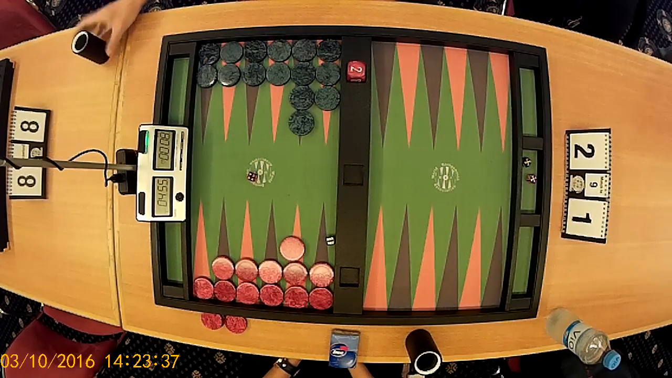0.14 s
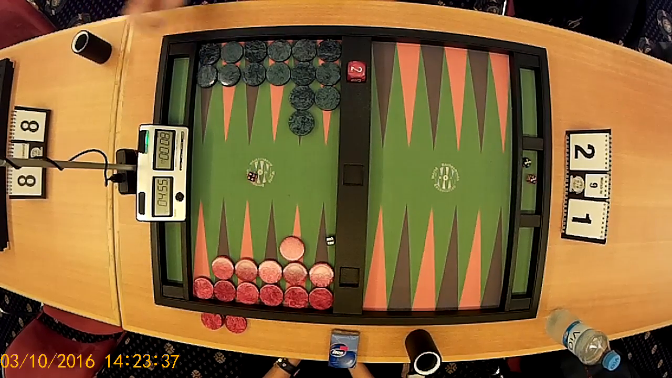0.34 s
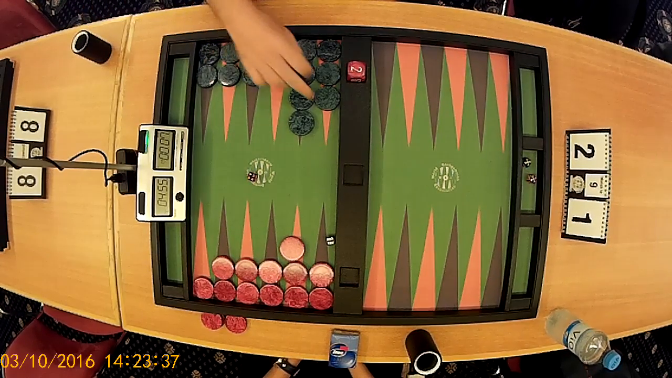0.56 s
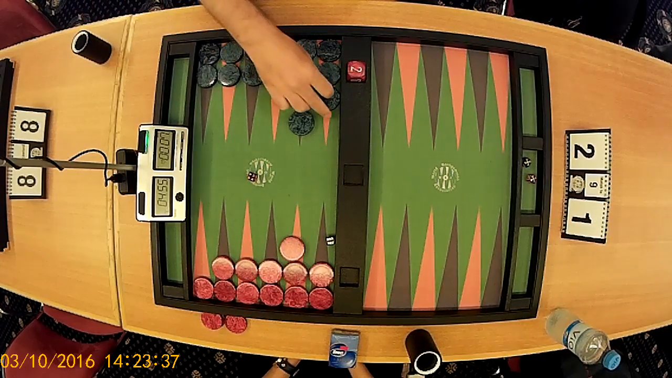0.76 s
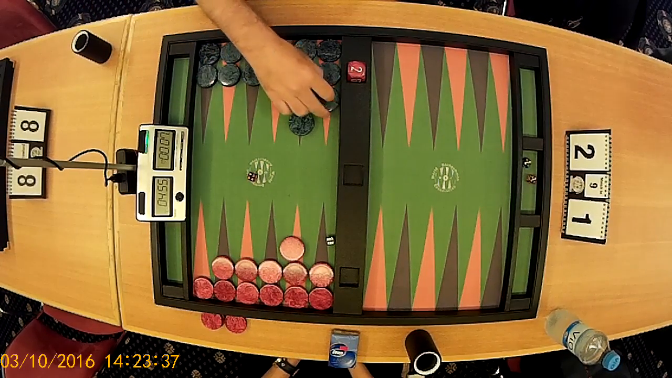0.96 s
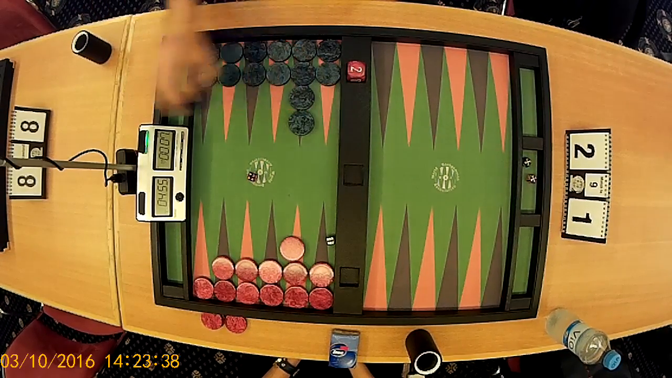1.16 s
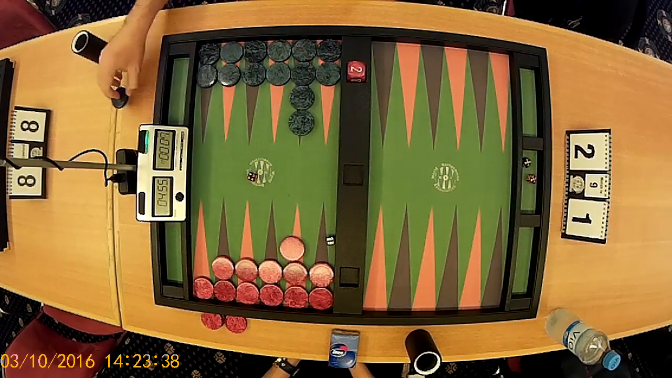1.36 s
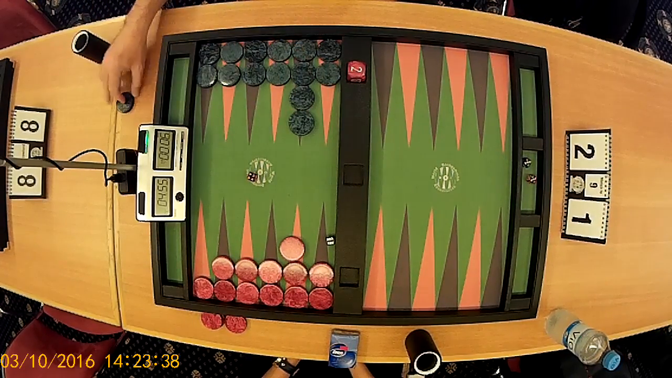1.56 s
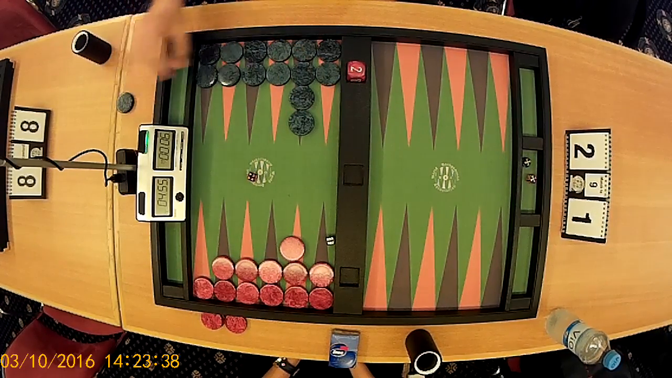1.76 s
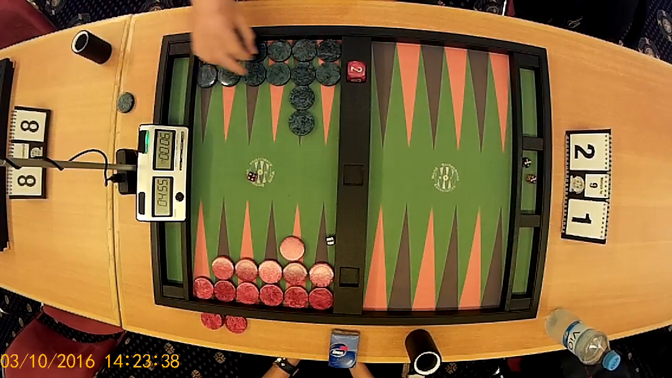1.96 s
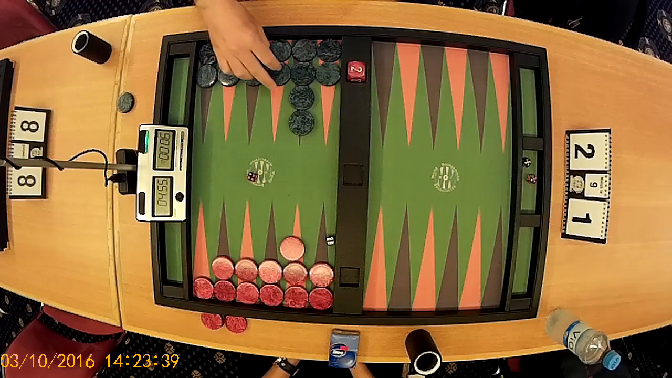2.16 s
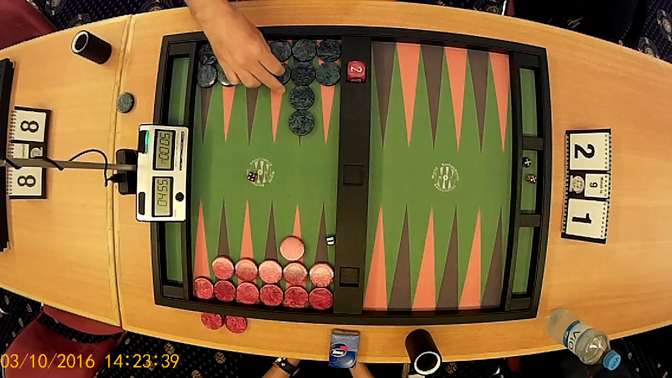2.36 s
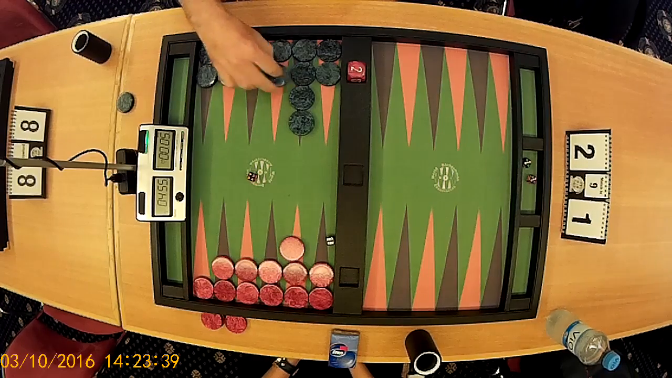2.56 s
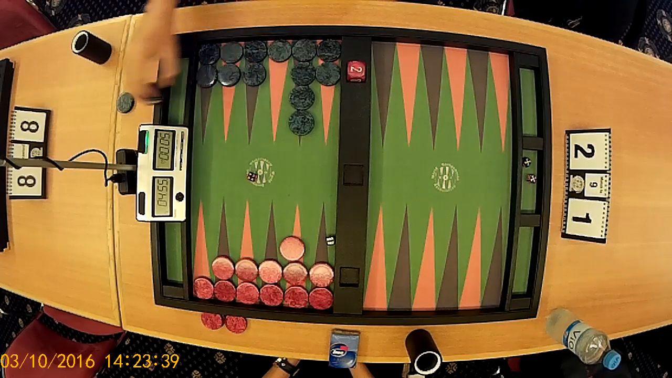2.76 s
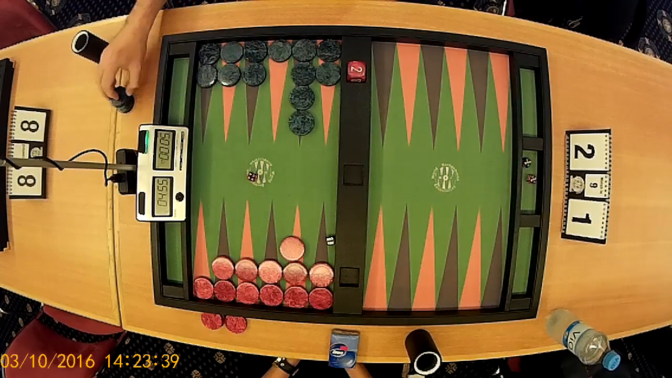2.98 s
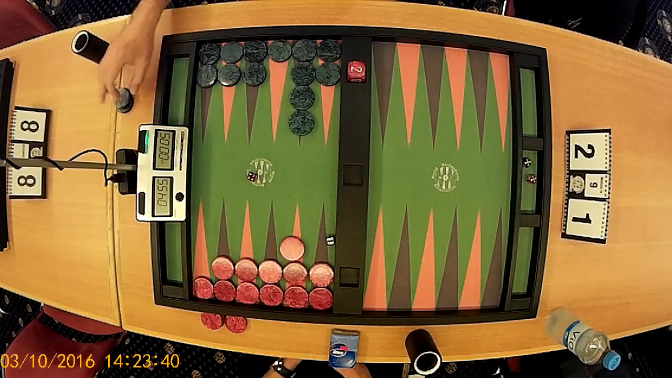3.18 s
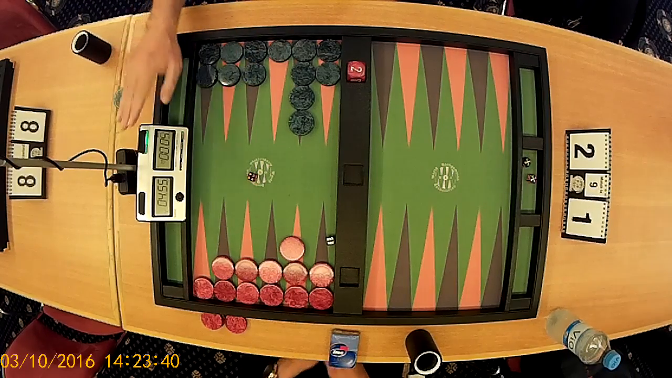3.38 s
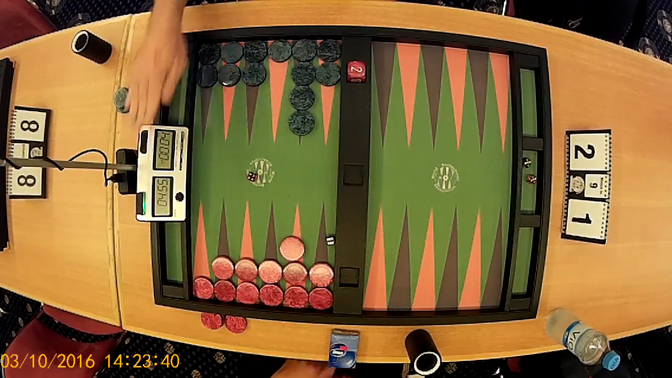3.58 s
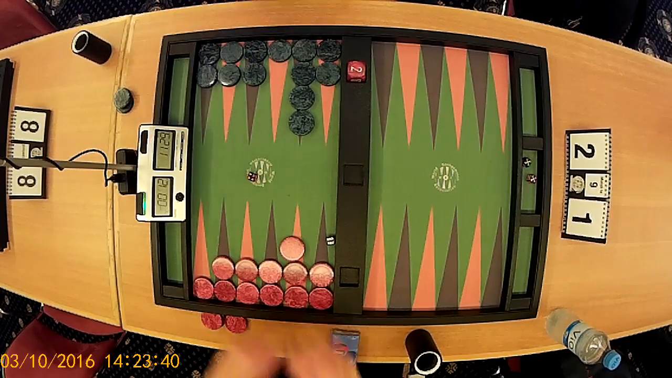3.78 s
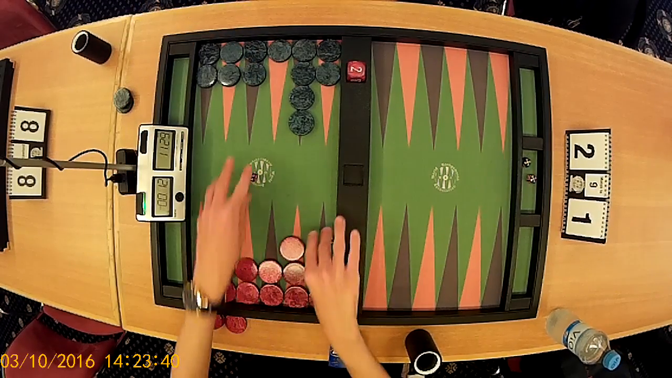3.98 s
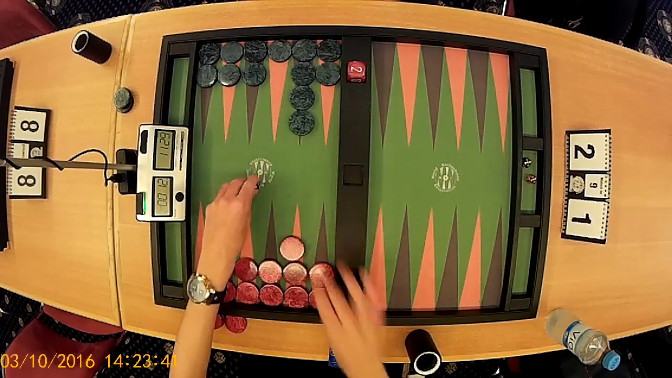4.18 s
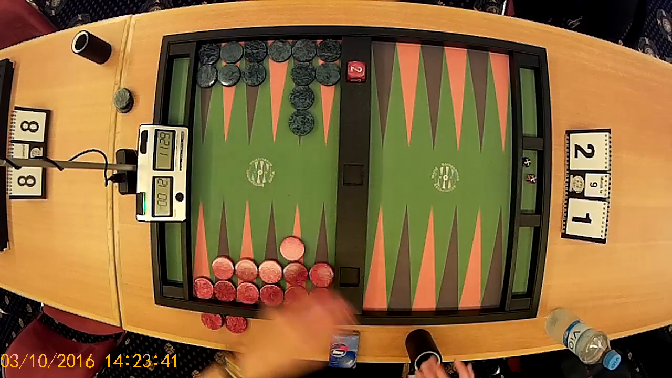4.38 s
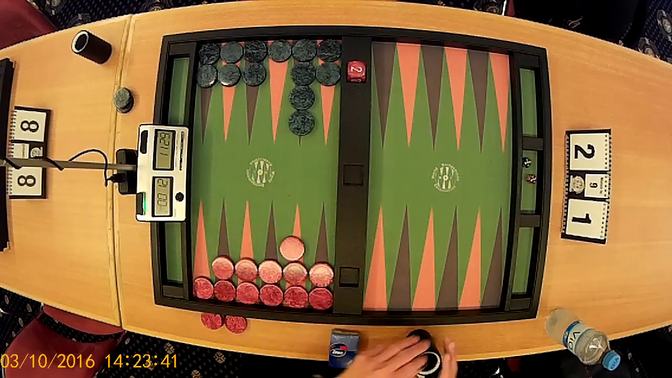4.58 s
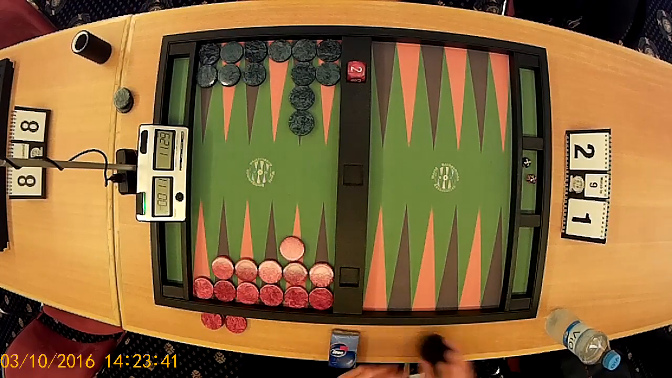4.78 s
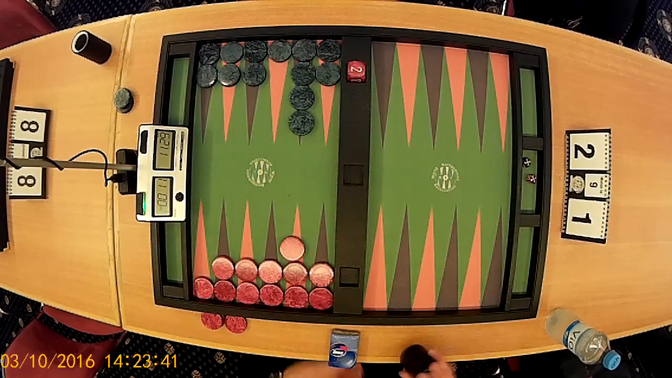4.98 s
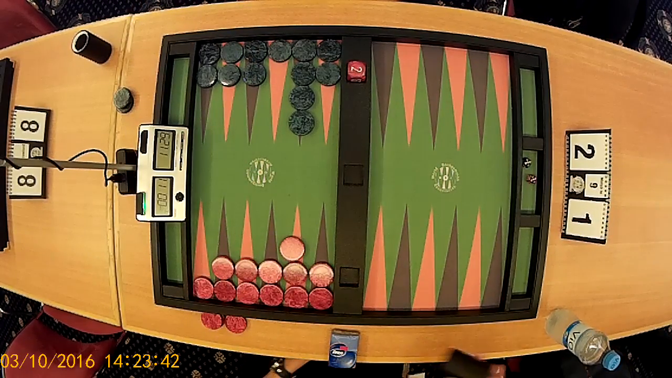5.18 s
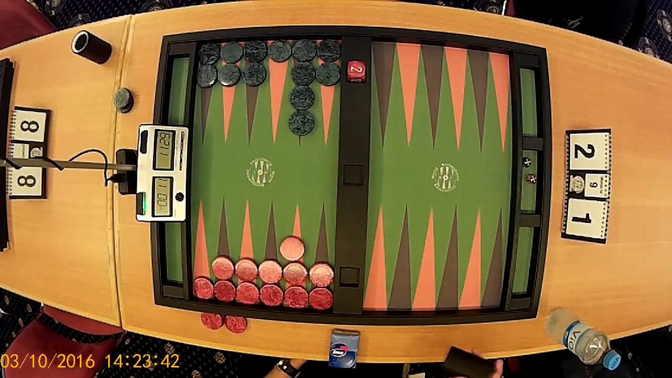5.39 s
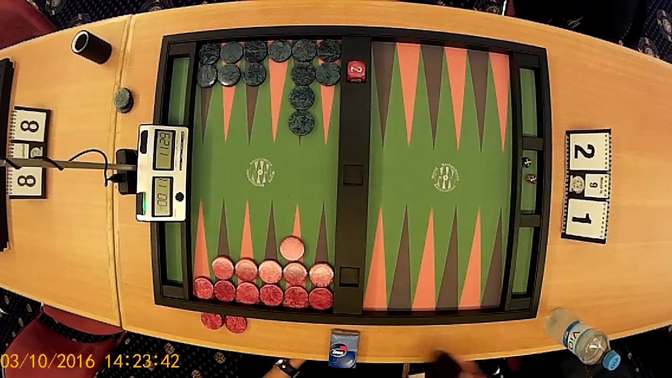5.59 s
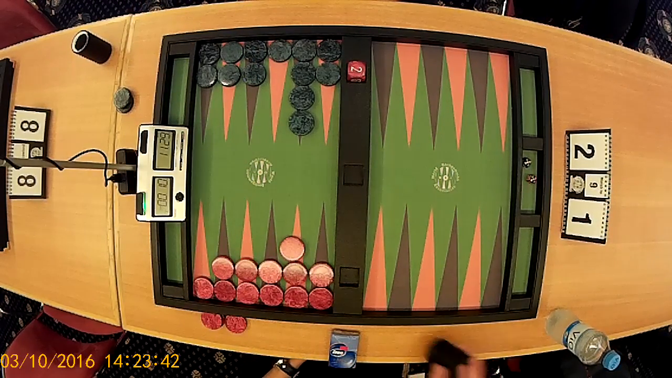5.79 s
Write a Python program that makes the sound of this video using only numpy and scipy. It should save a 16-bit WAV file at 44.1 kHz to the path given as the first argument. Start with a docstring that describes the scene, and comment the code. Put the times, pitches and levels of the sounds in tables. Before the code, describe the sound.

In a quiet, fairly reverberant hall, a microphone above a game table picks up faint ventilation rumble and hiss. Dice rattle softly in a distant cup, a checker knocks loudly on wood, and a far throw clatters on a board. More hard knocks follow with low thumps, then dice drop and tumble close by. Finally dice rattle hollowly in a near cup, ending with one solid knock.

```python
"""A quiet hall, heard from a microphone above a game table; ventilation rumbles under its hiss throughout.
First dice rattle in a cup at a far table, sounding its wall and its air.
Then checkers, a clock button and dice knock on the table top, whose bending waves bring the treble first,
over low thumps of the table, and a throw clatters on a far board. Last, dice rattle and clink in a near cup,
and a final knock lands. The hall answers knocks, thumps, cups and board with a tail of filtered noise."""
import sys
import numpy as np
from scipy import signal
from scipy.fft import rfft, irfft, next_fast_len
from scipy.io import wavfile
from scipy.ndimage import map_coordinates

SR = 44100
rng = np.random.default_rng(int(sys.argv[2]) if len(sys.argv) > 2 else 0)


def dump(signal):
    """Clip the signal to [-1, 1] and save it as 16-bit WAV at the path in sys.argv[1]."""
    limited = np.clip(np.atleast_2d(signal).T, -1, 1)
    pcm = np.round(limited * 32767).astype(np.int16)
    wavfile.write(sys.argv[1], SR, pcm)


def attenuation_scalar(level_db):
    """Turn a level in dB into a linear amplitude multiplier (20 dB per decade)."""
    decades = np.asarray(level_db, float) / 20
    return 10 ** decades


N = 257544  # samples, 5.84 s
SPAN = 8192  # samples in one blow
HZ = np.fft.rfftfreq(SPAN, 1 / SR)

# ventilation rumble: steady, then a quick small rise near 4.5 s and a slow one to the end: [start_s, level_db]
RUMBLE_LEVEL = [(0.0, -62), (4.49, -62), (4.62, -60), (5.84, -59)]
# colour of the rumble: [pitch_hz, density_db]
RUMBLE_COLOUR = [(12, -35), (20, -2.5), (27, -13.5), (54, -5.5), (160, -7.5), (306, -13.5), (359, -13),
                 (759, -22), (929, -22), (987, -23.5), (2500, -38.5), (3250, -64.5), (5500, -120)]
# colour of the microphone hiss: [pitch_hz, density_db]
HISS_COLOUR = [(300, 5.5), (3000, 1.5), (8000, 0), (14500, 0), (15600, -2), (16300, -16), (16500, -87)]
# dice landing in the far cup: [start_s, peak_db, air_pitch_hz, wall_db (relative)]
FAR_LANDINGS = [(0.306, -51.5, 666, 1.5), (0.411, -45.5, 781, -7), (0.438, -43.5, 743, -20),
                (0.546, -43.5, 620, -1.5), (0.639, -41, 757, -8.5), (0.773, -49, 880, -5.5),
                (0.868, -35, 760, -11), (0.914, -42, 751, -8.5), (0.999, -42, 570, 7),
                (1.088, -43.5, 770, -9.5), (1.214, -45, 745, -2.5), (1.299, -41.5, 760, -6.5),
                (1.444, -43.5, 580, 6), (1.662, -47.5, 849, -11.5)]
# resonances of a cup wall, before the pitch of each cup: [pitch_hz, width_hz, level_db]
WALL_MODES = [(1270, 520, -1), (1760, 410, -10), (1810, 500, -3.5), (2450, 252, 2), (2655, 256, -0.5)]
# resonances of a die's bright contact: [pitch_hz, width_hz, level_db]
TICK_MODES = [(3300, 570, -2.5), (4330, 650, -2), (6300, 4800, -12.5)]
# decay of the hall: [pitch_hz, t60_s]
HALL_DECAY = [(100, 0.25), (260, 0.61), (700, 0.47), (1840, 0.42), (4850, 0.55), (10000, 0.25)]
# colour of the hall's answer: [pitch_hz, gain_db]
HALL_COLOUR = [(100, 0.5), (300, 8.5), (800, -3.5), (1500, 3.5), (3000, -0.5), (8000, -6)]
# low thumps of the table under the knocks: [start_s, peak_db, favoured_hz]
LOW_THUMPS = [(0.773, -49.5, 250), (1.488, -38.5, 234), (2.299, -49, 238), (3.01, -32, 324),
              (3.448, -37.5, 158), (3.454, -28, 201.5), (4.462, -37, 280), (4.468, -43.5, 115),
              (4.553, -40, 250), (4.665, -42.5, 248), (4.682, -46, 115), (5.822, -24, 318),
              (5.828, -31, 115)]
# low modes of the table: [pitch_hz, width_hz, level_db]
TABLE_LOW_MODES = [(80.4, 22, -9), (115, 18, 8), (153.4, 77, 0), (213, 50, -1), (250, 52, -3),
                   (316.4, 16, -0.5), (387, 49, -5.5), (496, 80, -0.5)]
# knocks on the table top: [start_s, peak_db, ring_pitch_hz, upper_ring_db (relative), edge_db (relative)]
TABLE_KNOCKS = [(1.4826, -15, 839, -18, -12.5), (3.002, -26.5, 850, 4.5, 7),
                (3.0055, -15.5, 842, -12.5, -26.5), (3.446, -31, 980, -17, -25),
                (3.452, -14.5, 653, -17, -29), (4.248, -57, 690, -29, -43), (4.461, -26.5, 885, -19, -58),
                (4.552, -38.5, 890, -21, -45), (4.618, -43, 800, -33, -48), (4.662, -23.5, 880, -17, -37),
                (4.729, -38, 850, -24, -41), (5.821, -15, 770, -36.5, -42)]
# table top and checker, above the main ring: [pitch_hz, width_hz, level_db]
TABLE_UPPER_MODES = [(1184, 89, -2), (1557, 106, 4), (2145, 420, -1.5), (2270, 172, 2.5), (2750, 570, -8.5),
                     (3900, 430, -10.5), (4290, 160, -6), (4930, 1740, -15), (5950, 320, -17),
                     (7500, 450, -14.5), (8400, 490, -13.5), (9670, 720, -23.5), (12500, 1400, -25)]
# a knock as the air carries it: [pitch_hz, density_db]
CLACK_COLOUR = [(240, -39), (400, -9), (587, -26.5), (717, -6.5), (1150, 0), (1280, -10), (1550, -5),
                (4130, -29), (12000, -40), (15600, -72), (22000, -120)]
# bounces of a throw on the far board: [start_s, clatter_db]
BOARD_BOUNCES = [(1.919, -67), (1.998, -57), (2.077, -59), (2.14, -66.5), (2.183, -65.5), (2.28, -66),
                 (2.43, -70.5)]
# colour of the clatter: [pitch_hz, density_db]
CLATTER_COLOUR = [(290, -42.5), (500, -8), (714, 1), (780, 0), (1060, 0.5), (2500, -24), (3250, -56),
                  (5500, -120)]
# colour of the hollow body of the board: [pitch_hz, density_db]
BODY_COLOUR = [(150, -27), (280, -5), (335, 2.5), (380, -3), (430, 0.5), (600, -24), (1000, -60)]
# dice landing in the near cup: [start_s, peak_db, air_pitch_hz, wall_db (relative)]
NEAR_LANDINGS = [(4.895, -40, 679, -19), (4.906, -29, 698.4, -3.5), (4.936, -41, 753, -9),
                 (4.946, -41, 739, -5), (5.006, -26.5, 777.5, -7.5), (5.014, -27, 771, -14.5),
                 (5.161, -37.5, 793, -4), (5.174, -47.5, 703, -8), (5.217, -49, 556, -10),
                 (5.268, -35, 748, -11), (5.289, -33.5, 751, -9), (5.32, -43, 555, -4.5),
                 (5.445, -38.5, 710, -4), (5.547, -28, 738, -9), (5.576, -28, 735, -10),
                 (5.717, -36, 707, 0), (5.809, -29.5, 776, -15)]
# die on die in the near cup: [start_s, level_db (relative)]
DICE_CLINKS = [(4.906, -29.5), (4.946, -40.5), (4.991, -41), (5.006, -35), (5.161, -33), (5.32, -35),
               (5.445, -38), (5.546, -41), (5.615, -44), (5.706, -42), (5.764, -37)]

REPEAT_DULL_DB, REPEAT_SCATTER = -8, .12  # softer wall on a repeat; log spread of the gap between repeats
REPEAT_GRIP = 0.39  # dB more lost by a repeat per dB of wall sound: a die thrown at the wall slides
SWELL_S = .002  # the cup air takes about this long to speak
AIR_DAMPS = .5  # dB of cup air bandwidth gained per dB of wall sound: wall hits ring shorter
WALL_WANDER = .02  # relative spread of wall pitch from hit to hit
TICK_DB = -12.5  # bright tick of a landing, relative to its wall sound
CLACK_DB, CLACK_GROWS = -1.5, .4  # offset of the air clack; dB gained per dB of upper ring
CLATTER_T60_S, BODY_T60_S, BODY_DB = 0.48, 0.57, -7


def unit(x):
    """Scaled to rms 1."""
    return x / np.sqrt(np.mean(x ** 2) + 1e-20)


def along(points, hz):
    """Reads (pitch_hz, value) points on a log pitch axis."""
    f, v = np.transpose(points)
    return np.interp(np.log(hz + 1), np.log(f + 1), v)


def curve(rows):
    """A (start_s, level_db) table as gain per sample."""
    s, db = np.transpose(rows)
    return attenuation_scalar(np.interp(np.arange(N) / SR, s, db))


def coloured(x, points):
    """Filters x through a (pitch_hz, gain_db) spectrum."""
    m = next_fast_len(len(x) + SPAN)
    gain = attenuation_scalar(along(points, np.fft.rfftfreq(m, 1 / SR)))
    return irfft(rfft(x, m) * gain, m)[:len(x)]


def wobble(rate):
    """A smooth random curve, rate knots a second."""
    knots = rng.standard_normal(int(N * rate / SR) + 4)
    return map_coordinates(knots, [np.arange(N) * rate / SR])


def modes(table, scatter_db):
    """Spectrum of one blow on a set of resonances, each struck at a new strength; peak 1 in time."""
    ring = 0
    for k, (c, width, db) in enumerate(table):
        strength = (-1) ** k * attenuation_scalar(db + scatter_db * rng.standard_normal())
        ring = ring + strength * 1j * HZ * width / (c * c - HZ * HZ + 1j * HZ * width)
    return ring / np.abs(irfft(ring, SPAN)).max()


def dull(corner_hz, steep):
    """A soft contact lasts longer and loses what lies above its corner."""
    return (1 + 1j * HZ / corner_hz) ** -np.clip(steep, 0, 8)


def delayed(delay_s):
    """Spectrum of a plain delay."""
    return np.exp(-2j * np.pi * HZ * delay_s)


def add(track, s, db, spectrum):
    """Lays one blow on the track with its peak at db."""
    blow = irfft(spectrum, SPAN)
    track[round(s * SR):][:SPAN] += attenuation_scalar(db) * blow / np.abs(blow).max()


def ventilation():
    """Low-pitched noise, a rumble that swells a little."""
    swell = attenuation_scalar(0.2 * wobble(2.86) + 0.23 * wobble(6.4))
    return curve(RUMBLE_LEVEL) * swell * unit(coloured(rng.standard_normal(N), RUMBLE_COLOUR))


def microphone_hiss():
    """Steady self-noise of the microphone."""
    return attenuation_scalar(-67.5) * unit(coloured(rng.standard_normal(N), HISS_COLOUR))


def with_repeats(landings, gap_s, loss_db, count=3):
    """Every landing and its weaker repeats: hops in the near cup, probably wall echoes of the far one."""
    rows = []
    next_starts = [row[0] for row in landings[1:]] + [N / SR]
    for (s, db, air_hz, wall_db), next_s in zip(landings, next_starts):
        rows.append((s, db, air_hz, wall_db))
        chance = rng.standard_normal((count, 2))
        repeats = s + np.cumsum(gap_s * np.exp(REPEAT_SCATTER * chance[:, 0]))
        repeat_loss_db = loss_db + REPEAT_GRIP * wall_db
        for k, repeat_s in enumerate(repeats):
            if repeat_s < next_s - .01:
                repeat_hz = air_hz * (1 + 0.037 * chance[k, 1])
                rows.append((repeat_s, db - repeat_loss_db * (k + 1), repeat_hz, wall_db + REPEAT_DULL_DB))
    return rows


def chatter(length_s):
    """Spectrum of a contact that is a short irregular burst, not one clean touch."""
    t = np.arange(SPAN) / SR
    burst = rng.standard_normal(SPAN) * t * np.exp(-t / length_s)
    return rfft(burst / np.linalg.norm(burst))


def tick():
    """Spectrum of one bright contact of a die."""
    bright = modes(TICK_MODES, scatter_db=3.5) * (1 - dull(2300, 0.98))
    return bright * dull(6500, 5.3) * chatter(0.00035)


def cup(hits, width_hz, body_db, click_db, wall_pitch):
    """Each die clicks on the wall and sounds the air in the cup, whose pitch follows the covering hand."""
    track = np.zeros(N + SPAN)
    top_hz = 3100 * wall_pitch
    for s, db, air_hz, wall_db in hits:
        air_width_hz = width_hz * attenuation_scalar(AIR_DAMPS * wall_db)
        air = modes([(air_hz, air_width_hz, 0), (1.416 * air_hz, 250, body_db)], scatter_db=2.5)
        # a second copy, whole periods later, makes the air swell
        air = air * dull(984, 2.64) * (1 + delayed(np.round(SWELL_S * air_hz) / air_hz))
        this_wall = [(c * wall_pitch * (1 + WALL_WANDER * rng.standard_normal()), width, level)
                     for c, width, level in WALL_MODES]
        lowpass = 1 / (1 + 1.4j * HZ / top_hz - (HZ / top_hz) ** 2) ** 2
        wall = modes(this_wall, scatter_db=1.8) * lowpass
        add(track, s, db, air + attenuation_scalar(wall_db + click_db) * (wall + attenuation_scalar(TICK_DB) * tick()))
    return track[:N]


def early(x, level_db, count=40, reach_s=0.016, step=4096):
    """Weak early copies off nearby surfaces, fading with delay; taps redrawn at random every step samples."""
    out = np.zeros(N + step + SR // 20)
    for start in range(0, N, step):
        taps = np.zeros(SR // 20)
        delay = rng.uniform(0.00206, .045, count)
        taps[(SR * delay).astype(int)] = np.exp(-delay / reach_s) * rng.choice([-1, 1], count)
        copies = signal.fftconvolve(x[start:start + step], taps / np.linalg.norm(taps))
        out[start:start + len(copies)] += copies
    return x + attenuation_scalar(level_db) * out[:N]


def hall(x, rise_s=0.023, step=4096):
    """Far walls: the answer swells, then each pitch dies at its own speed; redrawn every step samples."""
    out = np.zeros(N + SR + step)
    for start in range(0, N, step):
        hz, t, z = signal.stft(rng.standard_normal(SR * 3 // 4), SR, nperseg=256)
        decay = attenuation_scalar(-60 * t / along(HALL_DECAY, hz)[:, None])
        swell = 1 - np.exp(-(t / rise_s) ** 2)
        tail = signal.istft(z * decay * swell, SR, nperseg=256)[1]
        wet = signal.fftconvolve(x[start:start + step], tail / np.linalg.norm(tail))
        out[start:start + len(wet)] += wet
    return coloured(out[:N], HALL_COLOUR)


def thumps(spread=0.28):
    """Where the table is struck decides which low modes answer most."""
    track = np.zeros(N + SPAN)
    for s, db, near_hz in LOW_THUMPS:
        # a mode loses 6 dB at one spread (in log pitch) from the favoured pitch
        struck = [(c, width, level - 6 * (np.log(c / near_hz) / spread) ** 2)
                  for c, width, level in TABLE_LOW_MODES]
        add(track, s - .003, db, modes(struck, scatter_db=4.0) * dull(880, 5.35))
    return track[:N]


def knocks(travel_s=0.004078):
    """Bending waves run faster at high pitch, so a knock sweeps down; the air gets a plain clack."""
    table, air = np.zeros((2, N + SPAN))
    # phase in cycles; its slope, the delay, is travel_s * (sqrt(800 / HZ) - 0.177)
    late = travel_s * (2 * np.sqrt(800 * HZ) - 0.177 * HZ)
    for s, db, ring_hz, upper_db, edge_db in TABLE_KNOCKS:
        ring = modes([(0.928 * ring_hz, 130, 0), (1.081 * ring_hz, 130, -1)], scatter_db=0.18)
        ring = ring * dull(3040, 1.3)
        upper = modes(TABLE_UPPER_MODES, scatter_db=0.5)
        mid = attenuation_scalar(upper_db + 22.5) * upper * dull(2960, 5.73)
        edge = attenuation_scalar(edge_db + 11.0) * upper * (1 - dull(1590, 2.3)) ** 2 * chatter(0.0013)
        add(table, s - .0015, db - 0.5, (ring + mid + edge) * np.exp(-2j * np.pi * late))
        hardness = dull(1300, -(edge_db + 26) / 5.7)  # more edge, brighter clack
        clack = attenuation_scalar(along(CLACK_COLOUR, HZ)) * hardness * delayed(0.003132)
        add(air, s, db + CLACK_DB + CLACK_GROWS * upper_db, clack)
    return table[:N], air[:N]


def after_bounces(t60):
    """Gain that jumps at each bounce and then decays."""
    t = np.arange(N) / SR
    return sum(attenuation_scalar(db - 60 * np.abs(t - s) / t60) * (t > s) for s, db in BOARD_BOUNCES)


def tumble():
    """Each bounce starts a flurry of irregular contacts; the hollow board lingers."""
    contacts = (rng.random(N) < 900 / SR) * attenuation_scalar(2.6 * rng.standard_normal(N))  # about 900 a second
    clatter = unit(coloured(contacts, CLATTER_COLOUR)) * after_bounces(CLATTER_T60_S)
    body = unit(coloured(contacts, BODY_COLOUR)) * after_bounces(BODY_T60_S)
    return clatter + attenuation_scalar(BODY_DB) * body


def clinks():
    """The two dice meet in flight, each time with one bright tick."""
    track = np.zeros(N + SPAN)
    for s, db in DICE_CLINKS:
        add(track, s, db - 9, tick())
    return track[:N]


def scene():
    """Near sources are mostly direct, far ones half hall."""
    far_hits = with_repeats(FAR_LANDINGS, gap_s=.042, loss_db=13.5, count=2)
    far = cup(far_hits, width_hz=98, body_db=-7.5, click_db=8, wall_pitch=0.91)
    far = early(far, level_db=2.0, reach_s=0.023)
    low = thumps()
    top, clack = knocks()
    table = early(top, level_db=-8.0)
    board = tumble()
    near_hits = with_repeats(NEAR_LANDINGS, gap_s=.034, loss_db=13.5)
    near = cup(near_hits, width_hz=51, body_db=-13, click_db=9.5, wall_pitch=0.94)
    near = early(near, level_db=-5.0)
    dice = clinks()
    # the clack is heard only through the hall
    to_hall = attenuation_scalar(-4) * far + attenuation_scalar(-12) * low + attenuation_scalar(-14.5) * table + clack
    to_hall = to_hall + attenuation_scalar(-5.5) * board + attenuation_scalar(-12.5) * near + attenuation_scalar(-13) * dice
    direct = far + low + table + board + near + dice
    return (direct + hall(to_hall) + ventilation())[None]


def roll_off(x):
    """The treble ends steeply here."""
    return signal.sosfilt(signal.butter(12, 16370, fs=SR, output="sos"), x)


def record(dry):
    """The microphone adds its hiss to the scene."""
    mix = dry + microphone_hiss()
    return roll_off(mix)


dry = scene()
out = record(dry)
dump(out)
```